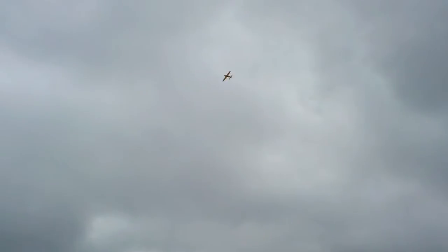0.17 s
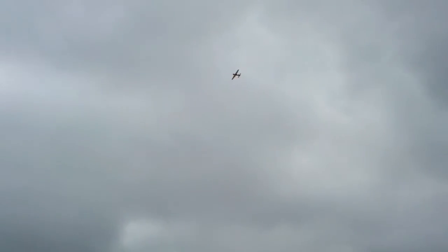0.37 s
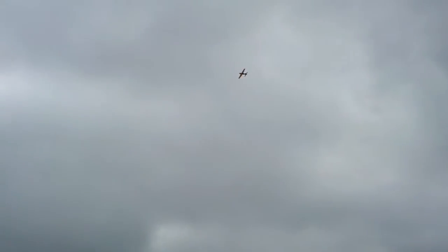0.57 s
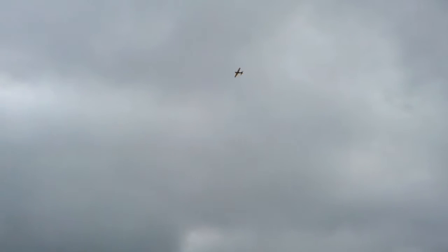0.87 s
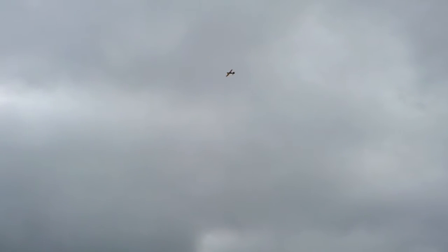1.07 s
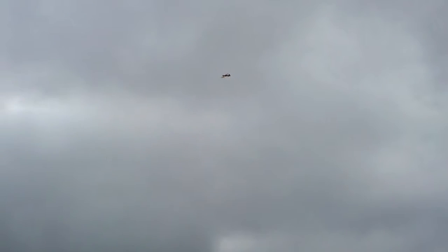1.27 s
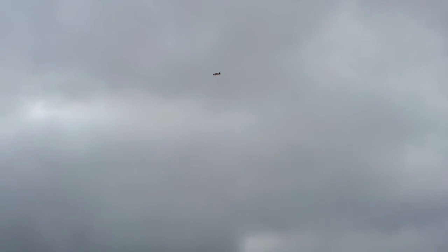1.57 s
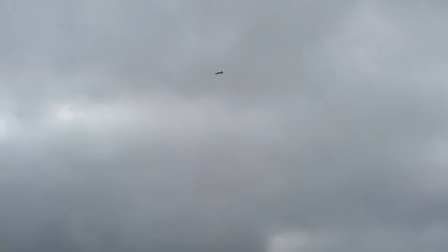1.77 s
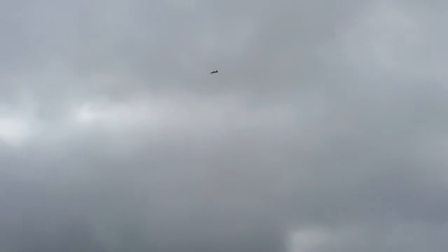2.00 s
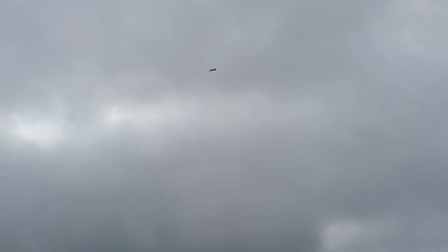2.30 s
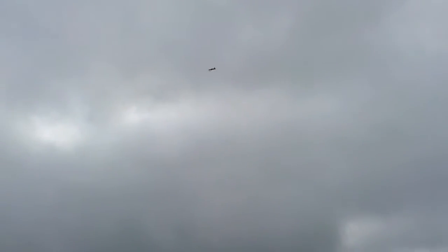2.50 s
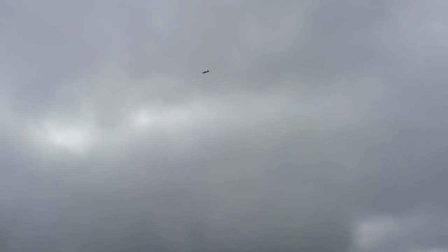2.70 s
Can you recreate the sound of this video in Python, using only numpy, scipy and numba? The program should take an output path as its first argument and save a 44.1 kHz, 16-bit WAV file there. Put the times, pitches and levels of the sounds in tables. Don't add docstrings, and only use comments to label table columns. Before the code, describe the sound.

A small single-engine propeller plane buzzes loudly overhead at full throttle, with low wind gusts thumping the microphone early on; around two seconds the engine is cut, drops in pitch and fades into faint open-air noise.

```python
import sys
import numpy as np
from scipy import signal
from scipy.fft import rfft, irfft
from scipy.io import wavfile
from scipy.ndimage import uniform_filter1d
from numba import njit

SR = 44100
rng = np.random.default_rng(int(sys.argv[2]) if len(sys.argv) > 2 else 0)


def convert_level_to_amplitude(level_db):
    exponent = np.asarray(level_db, float) / 20
    return 10 ** exponent


def generate_wav(sig):
    pcm = np.round(np.clip(np.atleast_2d(sig).T, -1, 1) * 32767).astype(np.int16)
    wavfile.write(sys.argv[1], SR, pcm)


N = 125685
T = np.arange(N) / SR


def colour(points):
    hz, db = np.array(points, float).T
    log_hz = np.log(np.fft.rfftfreq(N, 1 / SR) + 1)
    gain = convert_level_to_amplitude(np.interp(log_hz, np.log(hz), db, left=-60, right=-90))
    noise = irfft(rfft(rng.standard_normal(N)) * gain, N)
    return noise / noise.std()


def walk(rate):
    hold = int(SR / rate)
    held = np.repeat(rng.standard_normal(128)[:N // hold + 1], hold)[:N]
    return 1.73 * uniform_filter1d(uniform_filter1d(held, hold), hold)


def curve(table):
    times, *columns = np.array(table, float).T
    return [np.interp(T, times, column) for column in columns]


def bandpass(x, low_hz, high_hz):
    return signal.sosfilt(signal.butter(2, [low_hz, high_hz], "band", fs=SR, output="sos"), x)


# (frequency [Hz], density [dB per Hz])
FIELD_SPECTRUM = [(200, -32), (400, -16.5), (1200, -11.5), (2300, -16), (3500, -13), (5500, -18),
                  (7000, -33.5), (15500, -31)]


def field():
    level_db, swell_db = -41.5, 1.0
    return colour(FIELD_SPECTRUM) * convert_level_to_amplitude(level_db + swell_db * walk(4.26))


# (frequency [Hz], density [dB per Hz])
WIND_SPECTRUM = [(20, -11), (40, 0), (85, -2.5), (140, -6.5), (220, -15), (350, -23.5), (500, -28),
                 (900, -44.5)]
# (time [s], level [dB])
GUST_LEVEL = [(0, -38), (.1, -20.5), (.25, -9.5), (.4, -5), (.6, -8), (.7, -20), (.9, -15), (1.2, -22.5),
              (1.5, -15.5), (1.8, -20), (2.1, -20.5), (2.3, -24.5), (2.4, -25), (2.5, -28), (2.62, -35),
              (2.7, -28.5), (2.8, -19), (2.85, -24)]


def wind():
    flutter_db = 2.2
    return colour(WIND_SPECTRUM) * convert_level_to_amplitude(curve(GUST_LEVEL)[0] + flutter_db * walk(21.91))


# (time [s], peak [dB], frequency [Hz], length [s])
BUFFET_EVENTS = [(0.17, -26, 75, 0.016), (0.212, -2.5, 76.5, 0.014), (0.255, -4.5, 66, 0.054),
                 (0.328, -24, 81, 0.021), (0.405, 7.5, 90, 0.017), (0.431, -2, 88.3, 0.032),
                 (0.472, -12.5, 61.5, 0.051), (.54, -0.5, 75, 0.054), (.6, -7.5, 88.4, 0.05),
                 (0.651, -9.5, 175.6, 0.016), (0.747, -24, 90.94, 0.028), (0.872, 0, 83.6, 0.02),
                 (.927, 2, 72.4, 0.0034), (0.991, -29, 72, 0.032), (1.217, -8, 64.4, 0.018),
                 (1.29, -5, 56, 0.017), (1.427, -13, 62, 0.091), (1.66, -16, 71.2, 0.1),
                 (1.843, -8.5, 61.6, 0.014), (1.986, -11, 99.7, 0.056), (2.154, -17.5, 86, 0.063),
                 (2.21, -15.5, 75.7, 0.058), (2.25, -12, 69.4, 0.028), (2.331, -12.5, 73.9, 0.037),
                 (2.668, -17.5, 73, 0.034), (2.71, -18, 75.7, 0.034), (2.744, -12.5, 83, 0.014),
                 (2.784, -15, 125, 0.022), (2.806, -18.5, 48.1, 0.083)]


def buffets():
    out = np.zeros(N)
    for (start, db, hz, length), turn in zip(BUFFET_EVENTS, rng.random((len(BUFFET_EVENTS), 1))):
        swing = 2 * np.pi * (hz * (T - start) + turn)
        envelope = convert_level_to_amplitude(db) * np.exp(-(2 * (T - start) / length) ** 2)
        overtones = 0.26 * np.sin(2.32 * swing) + 0.036 * np.sin(4.35 * swing)
        out += envelope * (np.sin(swing) + overtones)
    return out


# (time [s], rate [Hz])
SHAFT_RATE = [(0, 99.35), (.6, 99.52), (.82, 99.8), (1.12, 100.2), (1.5, 100.5), (1.87, 101), (2.05, 100.8),
              (2.11, 98.4), (2.16, 94.8), (2.22, 87.5), (2.3, 82), (2.46, 79.5), (2.53, 88), (2.7, 80),
              (2.85, 76)]


def shaft_phase():
    jitter = 0.00085
    return 2 * np.pi * np.cumsum(curve(SHAFT_RATE)[0] * (1 + jitter * walk(25.38))) / SR


def throttle_cut():
    cut_s, length_s = 2.06, 0.1
    return np.clip((T - cut_s) / length_s, 0, 1)


def cycle_gate(phase):
    return 1 + 0.29 * np.cos(2 * phase) + 0.059 * np.cos(phase)


# (frequency [Hz], density [dB per Hz])
HISS_SPECTRUM = [(250, -25.5), (700, -5), (1200, -1), (2200, -7.5), (3100, -9.5), (5200, -6), (8500, -20.5),
                 (10500, -39.5)]


def gas_hiss(gate):
    return gate * colour(HISS_SPECTRUM) * convert_level_to_amplitude(1.26 * walk(15.4))


# (frequency [Hz], level [dB])
HIGH_ORDER_LEVEL = [(2100, -3.5), (2500, 3.5), (3100, 7), (3800, -0.5), (4900, 4.5), (6000, 1), (8500, -14),
                    (10400, -62.5)]


def high_orders(phase, idle):
    level_db, shimmer_db, drift = -3, 3, 1.1
    hz, db = np.array(HIGH_ORDER_LEVEL, float).T
    out = np.zeros(N)
    for k in range(21, 92):
        order_db = np.interp(np.log(k * 100), np.log(hz), db) + shimmer_db * walk(8.13)
        out += convert_level_to_amplitude(order_db) * np.cos(k * phase + drift * walk(4.98) + 0.045 * k ** 2)
    return convert_level_to_amplitude(level_db - 26 * idle) * out / out.std()


# (shaft multiple, level [dB])
RING_ORDERS = [(49, -1), (50, -8)]


def whistle(phase, idle, gate):
    centre_hz, width_hz, split_hz = 4690, 150, 130
    blades = sum(np.cos(k * phase + k ** 2) for k in range(44, 62, 2))
    drive = rng.standard_normal(N) + idle * convert_level_to_amplitude(-3) * blades / blades.std()
    low_hz, high_hz = centre_hz - width_hz / 2, centre_hz + width_hz / 2
    tone = sum(bandpass(drive, low_hz + shift, high_hz + shift) for shift in (-split_hz, split_hz))
    ring = sum(convert_level_to_amplitude(db + 6.5 * walk(2.7) - 45 * idle) * np.cos(int(k) * phase) for k, db in RING_ORDERS)
    return convert_level_to_amplitude(3.2 * idle - 8.0) * gate * tone / tone.std() + ring


# (shaft multiple, time [s], length [s], level [dB])
GLINT_EVENTS = [(29, .1, .4, -33), (31, .1, .45, -29), (32, .25, .6, -35), (34, .07, .25, -35),
                (38, .05, .2, -36), (46, .05, .2, -34), (58, .25, .2, -34), (39, .33, .3, -39),
                (57, .7, .2, -38), (39, .8, .15, -37), (25, 1.02, .5, -34), (23, 1.05, .4, -39),
                (29, 1.03, .35, -35), (32, 1.2, .3, -37), (49, 1.1, .2, -39), (38, 1.33, .3, -37),
                (50, 1.27, .2, -37), (35, 1.27, .2, -39), (24, 1.5, .4, -40), (39, 1.63, .3, -38),
                (32, 1.58, .2, -39), (26, 1.82, .6, -39), (28, 1.8, .6, -39), (29, 1.85, .6, -37),
                (31, 1.87, .3, -35), (42, 1.8, .3, -41), (50, 1.87, .3, -32), (49, 1.78, .3, -38),
                (47, 1.92, .25, -39), (27, 1.95, .3, -39), (30, 2.13, .14, -42), (32, 2.1, .2, -40),
                (28, 2.13, .14, -43), (78, 1.94, .25, -48), (84, 1.94, .25, -50)]


def glints(phase):
    level_db, flicker_db, drift = -2.5, 1.7, 0.8
    out = np.zeros(N)
    for k, centre, length, db in GLINT_EVENTS:
        lobe = np.exp(-(2 * (T - centre) / length) ** 4)
        level = convert_level_to_amplitude(db + level_db + flicker_db * walk(13.4))
        out += level * lobe * np.cos(k * phase + k ** 2 + drift * walk(12))
    return out


# (shaft multiple, level [dB])
BELLY_VIEW = [(1, -5), (2, 3), (3, -35), (4, -10), (5, -26), (6, -10), (7, -11), (8, -10.5), (9, -12),
              (10, 6.5), (11, -9), (12, 2), (13, -55), (14, -10), (15, -26), (16, -22), (17, -57),
              (18, -28), (19, -45), (20, -23)]
ROLLING_VIEW = [(1, 0), (2, -4.5), (3, -12.5), (4, -13), (5, -17), (6, -16), (7, -9.5), (8, -16), (9, -15),
                (10, -16), (11, -5.5), (12, -7.5), (13, -40), (14, -6.5), (15, -22), (16, -29), (17, -44),
                (18, -20), (19, -32), (20, -24)]
SIDE_VIEW = [(1, -2), (2, 3.5), (3, -12.5), (4, -9.5), (5, -9.5), (6, -10), (7, 0.5), (8, -33), (9, -17),
             (10, 1.5), (11, -6.5), (12, -27), (13, -46), (14, -2), (15, -13.5), (16, -5.5), (17, -23),
             (18, -15), (19, -36), (20, -9)]
BANKED_VIEW = [(1, -6), (2, 3), (3, -14.5), (4, -9), (5, -9), (6, -18.5), (7, -13), (8, -51), (9, -45),
               (10, -4), (11, -15), (12, -7), (13, -19), (14, -1.5), (15, -12.5), (16, -11.5), (17, -27),
               (18, -23), (19, -25), (20, -16)]
LEVELLING_VIEW = [(1, -6), (2, 1.5), (3, -17), (4, -13), (5, -19.5), (6, -22), (7, -13), (8, -32), (9, -27),
                  (10, -7), (11, -22), (12, -7.5), (13, -28), (14, -13.5), (15, -15), (16, -27), (17, -22),
                  (18, -26), (19, -25), (20, -42)]
TAIL_VIEW = [(1, -5), (2, 1.5), (3, -18), (4, -13), (5, -23.5), (6, -14), (7, -24.5), (8, -54), (9, -44),
             (10, -8), (11, -23), (12, -14), (13, -23), (14, -13.5), (15, -23), (16, -18), (17, -21),
             (18, -27), (19, -24.5), (20, -38)]
VIEW_TIMES = [.25, .53, .8, 1.25, 1.6, 1.95]


def low_orders(phase, idle):
    views = [BELLY_VIEW, ROLLING_VIEW, SIDE_VIEW, BANKED_VIEW, LEVELLING_VIEW, TAIL_VIEW]
    views = np.array(views, float)[:, :, 1]
    views -= 10 * np.log10(np.sum(convert_level_to_amplitude(views[:, 1:]) ** 2, axis=1, keepdims=True) / 2)
    out = np.zeros(N)
    for k in range(2, 21):
        idle_db = -3 * max(k - 5, 0) + 9 * (k in (4, 5)) + 2.5 * (k == 2)
        view_db = np.interp(T, VIEW_TIMES, views[:, k - 1])
        level = convert_level_to_amplitude(view_db + 1.53 * walk(8.13) + idle * idle_db)
        pipe_lag = 0.07 * k ** 2 + 0.7 * (k % 2)
        out += level * np.cos(k * phase - pipe_lag)
    return out


# (time [s], drone [dB], hiss [dB], whistle [dB])
THROTTLE_LEVELS = [(0, -12.5, -22.5, -33), (.2, -12.5, -25.5, -24), (.32, -9, -18.5, -14),
                   (.39, -9, -21.5, -21.5), (.41, -9.5, -22, -27), (.52, -13.5, -25, -42),
                   (.8, -16, -31, -60), (1.3, -15, -29.5, -51), (1.75, -17, -31, -55),
                   (1.9, -16.5, -27.5, -49), (2.05, -17.5, -28.5, -42), (2.11, -21.5, -30, -28),
                   (2.16, -26, -30, -26), (2.22, -27.5, -38.5, -40.5), (2.3, -36, -42, -47),
                   (2.48, -44, -47, -75), (2.6, -37.5, -50, -61), (2.85, -57, -41, -63)]


def plane():
    phase, idle = shaft_phase(), throttle_cut()
    gate = cycle_gate(phase)
    drone_db, hiss_db, whistle_db = curve(THROTTLE_LEVELS)
    drone = -convert_level_to_amplitude(drone_db) * low_orders(phase, idle)
    shimmer = convert_level_to_amplitude(hiss_db) * high_orders(phase, idle)
    beams = glints(phase)
    whistling = convert_level_to_amplitude(whistle_db) * whistle(phase, idle, gate)
    hiss = convert_level_to_amplitude(hiss_db) * gas_hiss(gate)
    return drone + shimmer + beams + whistling + hiss


def scene():
    return (plane() + wind() + buffets() + field())[None]


@njit
def duck(x, top, power, attack, release):
    y, envelope = np.empty(len(x)), top
    for i in range(len(x)):
        peak = abs(x[i])
        envelope += (peak - envelope) * (attack if peak > envelope else release)
        y[i] = x[i] * min(1., top / envelope) ** power
    return y


def preamp_hiss(dry, x):
    hiss_db, duck_db, treble_quiet_db, buffet_quiet_db = -52, -13, -40, -21
    treble = signal.sosfilt(signal.butter(4, 1500, "high", fs=SR, output="sos"), dry)
    treble_db = 10 * np.log10(uniform_filter1d(treble ** 2, size=1500) + 1e-12)
    buffet_db = 10 * np.log10(uniform_filter1d(x ** 2, size=1200) + 1e-12)
    excess_db = np.maximum(treble_db - treble_quiet_db, buffet_db - buffet_quiet_db)
    return convert_level_to_amplitude(hiss_db + duck_db * np.clip(excess_db / 2, 0, 1)) * rng.standard_normal(N)


def band_limit(x):
    return signal.sosfilt(signal.butter(12, 15650, fs=SR, output="sos"), x)


def record(dry):
    top_db, ratio, attack_s, release_s = -13, 4.03, 0.00079, 0.0074
    soft_clip, top_hz = 1.1, 10600
    x = duck(dry[0], float(convert_level_to_amplitude(top_db)), 1 - 1 / ratio, 1 / (attack_s * SR), 1 / (release_s * SR))
    x = soft_clip * np.tanh(x / soft_clip)
    x = x * np.minimum(np.arange(N) / 60, 1)
    x = signal.sosfilt(signal.ellip(6, 0.5, 50, top_hz, fs=SR, output="sos"), x)
    x = x + preamp_hiss(dry[0], x)
    return band_limit(x[None])


dry = scene()
out = record(dry)
generate_wav(out)
```